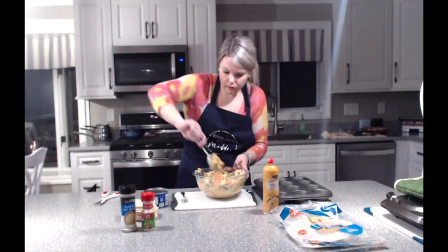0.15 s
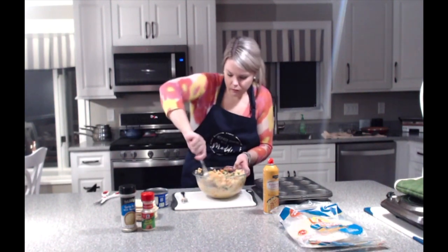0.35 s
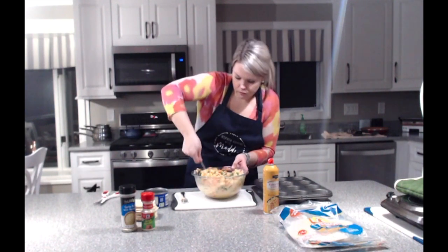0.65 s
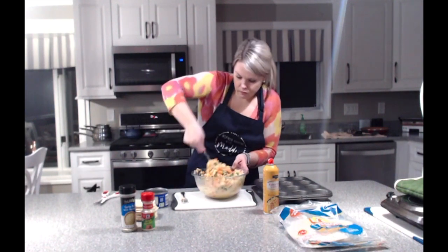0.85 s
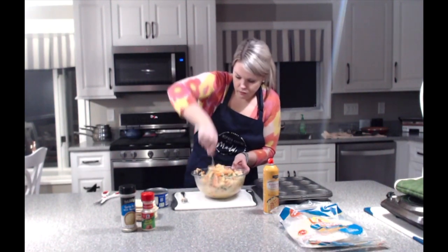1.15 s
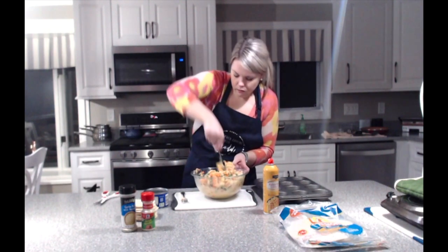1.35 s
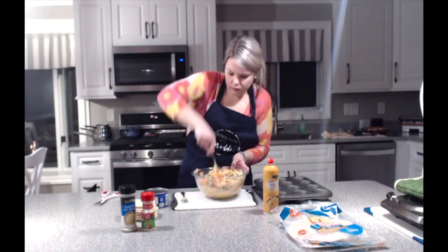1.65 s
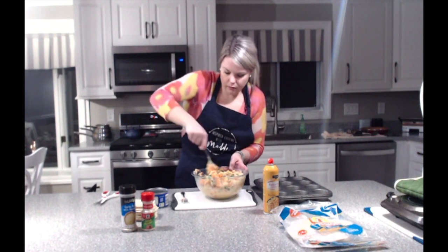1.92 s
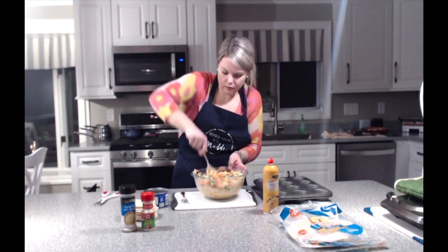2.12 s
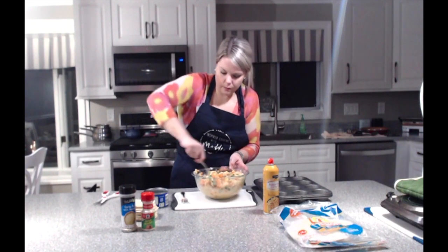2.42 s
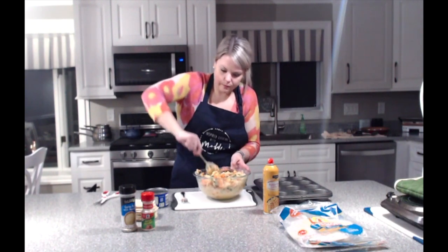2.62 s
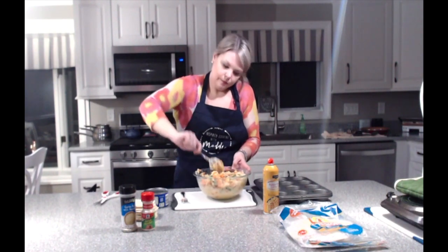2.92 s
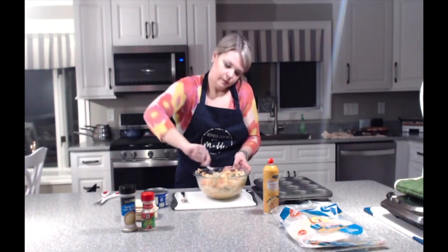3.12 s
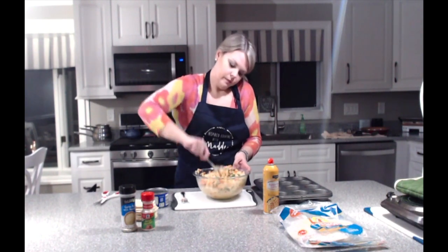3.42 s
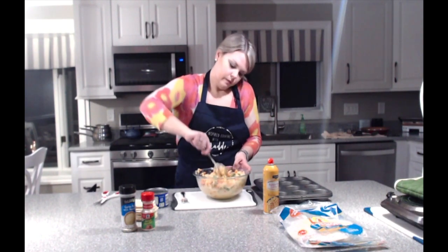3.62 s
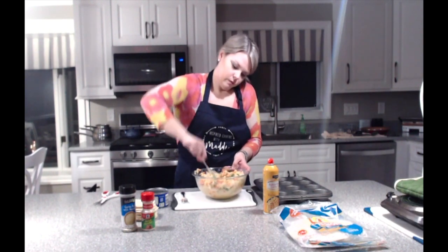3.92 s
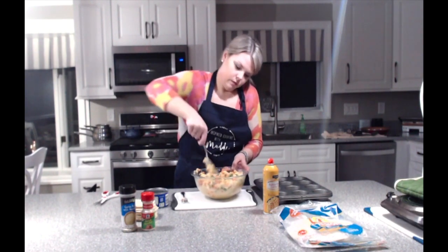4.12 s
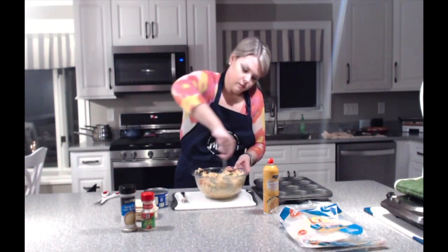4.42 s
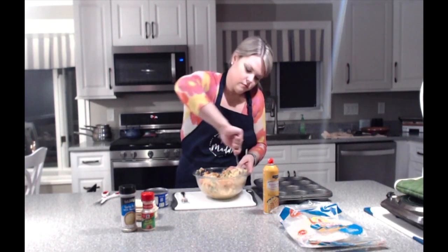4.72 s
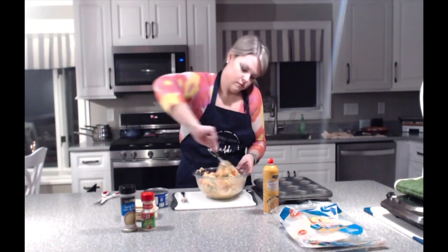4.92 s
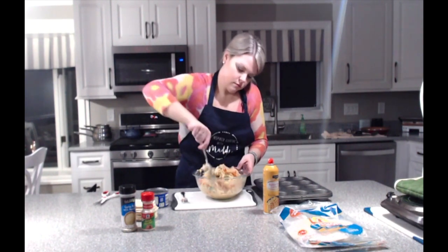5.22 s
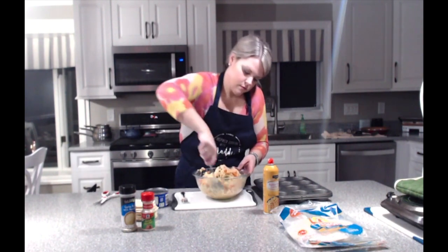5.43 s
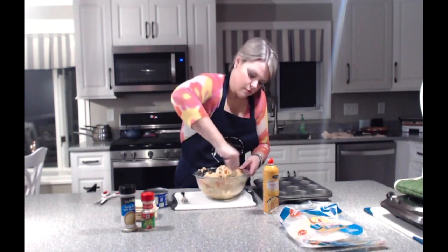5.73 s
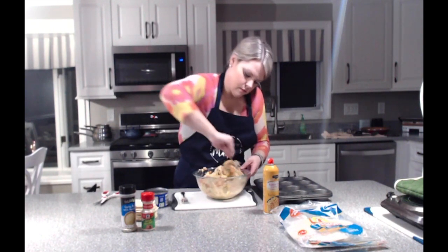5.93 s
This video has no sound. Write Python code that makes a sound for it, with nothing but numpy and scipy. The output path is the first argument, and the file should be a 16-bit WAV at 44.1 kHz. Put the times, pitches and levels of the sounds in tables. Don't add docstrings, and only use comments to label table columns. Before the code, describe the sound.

Wet stirring in a hard-walled kitchen, with muffled taps, one very loud sharp glass clink midway, and steady appliance hum and hiss.

```python
import sys
import numpy as np
from scipy import signal
from scipy.fft import rfft, irfft, next_fast_len
from scipy.io import wavfile
from scipy.ndimage import uniform_filter1d

SR = 44100
rng = np.random.default_rng(int(sys.argv[2]) if len(sys.argv) > 2 else 0)


def field_ratio(decibels):
    return 10 ** (np.asarray(decibels, dtype=float) / 20)


def store_wav(level_fs):
    pcm = np.round(np.clip(np.atleast_2d(level_fs), -1, 1) * 32767)
    wavfile.write(sys.argv[1], SR, pcm.T.astype(np.int16))


N = 267246

# pitch_hz, level_db (per Hz)
HUM_AND_HISS = [(15, -58.5), (30, -26), (53, -7.5), (92, -6), (205, -4), (234, -10), (260, -4.5), (364, -3),
                (394, -6.5), (628, -19), (859, -14), (1340, -20.5), (3780, -28.5), (12500, -38.5),
                (16200, -74.5), (22000, -120)]
AIR_DB, AIR_TOP_HZ = -46.5, 12500
# pitch_hz, width_hz, lift_db
ROOM_MODES = [(67, 3.3, 6), (159.4, 21, 6.5), (209.2, 7.4, 11), (265.7, 11, 6), (336, 39, -2),
              (431.7, 6.7, 11), (487, 14.6, 9), (863, 29, 4)]
# delay_s, level_db
WALL_ECHOES = [(.0058, -8), (.0095, -14), (0.0143, -13), (0.0178, -14), (.0215, -14), (.030, -18),
               (.043, -17)]
# pitch_hz, t60_s (time to fall 60 dB)
KITCHEN_DECAY = [(300, .2), (700, 0.24), (1400, 0.27), (2600, .3), (5000, 0.23), (7500, 0.23), (9000, 0.19),
                 (16000, 0.13)]

# start_s, length_s, slop_db, crackle_over_slop_db
STROKES = [(0.197, .3, -48, -6), (0.498, 0.22, -50.5, -9), (0.76, 0.12, -61, -6), (1.03, 0.16, -52.5, -4.5),
           (1.346, 0.16, -51.5, -5.5), (1.67, 0.17, -51, -8.5), (1.964, 0.1, -47.5, -6.5),
           (2.274, 0.23, -51.5, -6.5), (3.058, 0.21, -48, -4), (3.412, 0.14, -51.5, -6.5),
           (3.62, .18, -65, 0), (3.887, 0.04, -46.5, -13), (4.183, 0.26, -48, -5.5),
           (4.617, 0.22, -60.5, -1.5), (4.874, .17, -49.5, -5.5), (5.27, 0.068, -51.5, -10),
           (5.48, 0.26, -51, -7.5), (5.817, .12, -73.5, 10)]
BITE_S, SETTLE_S = 0.014, 0.05
# crackle_db, slop_db
SLUMP_DB = (-61, -59)
# pitch_hz, level_db (per Hz)
SLOP_TONE = [(500, -49.5), (800, 6.5), (1200, 6.5), (1900, 3.5), (2700, -2.5), (4000, -39.5), (13000, -98)]
# pitch_hz, level_db (per Hz)
CRACKLE_TONE = [(2000, -44), (3000, -5), (5000, -1.5), (8000, -8.5), (11000, -16.5), (13100, -22),
                (13450, -80.5)]
# start_s, peak_db, pitch_hz
SNAPS = [(0.6729, -47, 9810), (0.7894, -51, 9100), (1.1694, -51, 9990), (1.2694, -61, 7900),
         (1.3369, -51, 9570), (1.4671, -49, 8460), (1.5794, -55, 10500), (1.6694, -56, 7830),
         (1.8394, -53, 8040), (2.1294, -63, 8100), (3.5523, -49, 10400), (3.6, -51, 8740),
         (3.7294, -59, 7550), (4.4478, -50, 7800), (5.4869, -49.5, 10100), (5.5827, -55, 7910),
         (5.6776, -49, 8240), (5.8222, -46, 9900)]
SNAP_T60_S = 0.008

# start_s, peak_db, pitch_hz, t60_s
TICKS = [(2.2923, -45, 4200, 0.012), (2.3296, -51, 4070, 0.014), (2.3456, -38, 4150, 0.0044),
         (3.0678, -41, 3200, 0.0098), (3.0991, -39, 6140, 0.013), (3.472, -44, 4160, 0.0067),
         (3.5208, -42.5, 4700, 0.014), (3.8831, -41.5, 3680, 0.012), (4.784, -44, 5540, 0.011),
         (4.9647, -44, 5960, 0.008), (5.2672, -43, 4350, 0.011), (5.4782, -40, 4240, 0.0088),
         (5.8083, -45.5, 5000, 0.014)]
# start_s, peak_db, pitch_hz, t60_s
SPOON_RINGS = [(1.963, -40, 15300, .03), (1.97, -40, 14600, 0.036), (1.963, -42.5, 10850, 0.016),
               (1.964, -40, 6400, 0.018), (1.9627, -26.5, 3630, 0.0051), (1.963, -33.5, 4260, 0.011),
               (3.144, -38, 11700, 0.035), (3.148, -46, 10400, 0.03), (3.15, -62, 15300, .02),
               (4.186, -45, 10800, 0.02), (4.257, -44, 10200, .015)]
# start_s, peak_db, pitch_hz, t60_s
KNOCKS = [(0.616, -35, 1250, 0.021), (0.63, -39.5, 2610, .04), (1.068, -42, 973, 0.076),
          (1.073, -17, 1275, 0.011), (1.367, -35, 976, 0.026), (1.38, -32, 1410, 0.051),
          (1.457, -39, 1830, 0.022), (1.699, -37, 1830, 0.022), (1.762, -44, 1570, 0.03),
          (1.969, -39, 1000, 0.031), (2.335, -32, 2195, 0.034), (2.36, -30.5, 2028, 0.045),
          (3.155, -21.5, 1363, 0.038), (3.17, -18, 1317, 0.03), (3.198, -33, 1358, 0.058),
          (3.507, -39.5, 1060, 0.036), (3.734, -39, 1890, 0.02), (3.887, -31, 1710, 0.026),
          (4.891, -49, 1010, 0.015), (5.045, -34, 1100, 0.016), (5.243, -27.5, 1225, 0.031),
          (5.39, -32.5, 1226, 0.027), (5.488, -38, 1920, 0.022), (5.638, -38, 950, 0.034)]
# start_s, peak_db, pitch_hz, t60_s
BOARD_BUMPS = [
    (0.2415, -17, 713, 0.05),
    (0.245, -11.5, 539, 0.027),
    (2.622, -4.5, 912, 0.011),
    (2.623, -20, 542, 0.037),
    (4.27, -40.5, 626, 0.098),
]
# start_s, peak_db, pitch_hz, t60_s
GRAZES = [(5.283, -35.5, 1600, 0.1), (2.2655, -21.5, 1410, 0.028), (2.305, -29, 1353, 0.071),
          (2.6005, -26, 1410, 0.027), (2.6075, -23, 1410, 0.065), (2.608, -31.5, 3975, 0.045),
          (4.198, -14, 2620, 0.11), (4.217, -26, 2530, 0.036), (4.2375, -23, 2560, 0.037),
          (4.2545, -19, 4050, 0.062), (4.256, -17.5, 2640, 0.027), (4.257, -39, 7340, 0.024),
          (4.257, -17, 1310, 0.016), (4.263, -21.5, 1460, 0.025), (4.271, -14, 1484, 0.035),
          (4.269, -21.5, 2150, 0.046), (4.273, -23, 2490, 0.03), (4.286, -25, 2670, 0.023),
          (4.287, -27, 1360, 0.02)]

# start_s, level_db, contact_s, room_db, linger (factor on the #
CLINKS = [
    (0.2408, -8.5, 0.0015, -3, .9),
    (2.6217, -2.5, 0.00051, -1.5, 1.25),
    (4.1845, -21, 0.0017, -4, .8),
]
# pitch_hz, t60_s, low_wall_db, lip_db, handle_side_db
BOWL_MODES = [(1147, 0.071, -9, -18, -40), (1410, 0.058, -7.5, -11, -12.5), (2000, 0.066, -13.5, -12, -41),
              (2224, 0.021, 2, 3.5, -33), (2497, 0.021, 12.5, -10.5, -20), (2618, 0.03, 0, 3, 5),
              (2783, 0.01, 6, 8, -6), (2974, 0.028, -2, -8.5, -27), (4037, 0.029, 0.5, 2.5, 8.5),
              (4237, 0.014, 7.5, 7, -1), (4800, 0.012, 0.5, 0.5, -34), (5640, 0.03, -15, 2, -16.5),
              (6250, 0.016, -6.5, -22.5, -40), (6720, 0.017, 0.5, -1, -25), (7240, 0.029, -15, -1, -9),
              (7340, 0.015, 6.5, 0, 6.5), (8550, 0.02, -8.5, -17.5, -20), (9650, 0.034, -17, -8.5, -24),
              (10150, 0.028, -17, -9, -34), (12000, 0.012, -35, -16.5, -22.5),
              (14000, 0.03, -55, -21.5, -44), (15300, 0.037, -39, -30, -60)]
# start_s, level_db, lowest_hz, brightness_db (per octave)
EDGE_CRACKS = [
    (0.24, -25, 5700, -28),
    (2.622, -5.5, 1011, 2),
]

# start_s, peak_db, width_s
THUMP = (2.623, -26, 0.0008)
TOP_HZ = 15800


def unit(x):
    return x / np.sqrt(np.mean(x ** 2) + 1e-20)


def along(points, hz):
    f, v = np.transpose(points)
    return np.interp(np.log(hz + 1), np.log(f + 1), v)


def coloured(x, gain_db):
    m = next_fast_len(len(x) + 8192)
    gain = field_ratio(gain_db(np.fft.rfftfreq(m, 1 / SR)))
    return irfft(rfft(x, m) * gain, m)[:len(x)]


def patchy(x, depth_db):
    z = signal.stft(x, nperseg=512)[2]
    field = uniform_filter1d(rng.standard_normal(z.shape), size=9, axis=0)
    field = uniform_filter1d(field, size=8, axis=1)
    return signal.istft(z * field_ratio(depth_db * unit(field)), nperseg=512)[1][:N]


def ring(hz, t60, t, attack):
    return np.sin(2 * np.pi * hz * t) * field_ratio(-60 * t / t60) * (1 - np.exp(-(t / attack) ** 2))


def add(track, s, sound):
    part = track[round(s * SR):][:len(sound)]
    part += sound[:len(part)]


def room_air():
    def tone(hz):
        lift = sum(db / (1 + ((hz - centre) / width * 2) ** 2) for centre, width, db in ROOM_MODES)
        edge = -60 * np.clip((hz - AIR_TOP_HZ) / 400, 0, 1)
        return along(HUM_AND_HISS, hz) + lift + edge

    return field_ratio(AIR_DB) * unit(coloured(rng.standard_normal(N), tone))


def kitchen(blow, wet_db, linger=0.79):
    hz, t, z = signal.stft(rng.standard_normal(SR // 2), SR, nperseg=256)
    age = t / (linger * along(KITCHEN_DECAY, hz)[:, None])
    tail = signal.istft(z * field_ratio(-60 * age ** 1.7), SR, nperseg=256)[1][:SR // 2]
    tail = tail * (1 - np.exp(-np.arange(len(tail)) / SR / 0.0031))
    answer = field_ratio(wet_db) * tail / np.linalg.norm(tail)
    answer[0] = 1
    for delay, db in WALL_ECHOES:
        answer[round(delay * SR)] += field_ratio(db)
    return signal.fftconvolve(blow, answer)


def strokes():
    s, length, slop_db, crackle_db = np.transpose(STROKES)[:, :, None]
    age = np.arange(0, N, 64) / SR - s
    bite = np.minimum(age, 0) / BITE_S
    settle = np.maximum(age - length, 0) / SETTLE_S
    shape = np.exp(bite - settle)
    strengths = []
    for rest, db in zip(SLUMP_DB, (slop_db + crackle_db, slop_db)):
        power = field_ratio(2 * rest) + (shape ** 2 * field_ratio(2 * db)).sum(0)
        strengths.append(np.sqrt(np.repeat(power, 64)[:N]))
    return strengths


def stirring():
    out = np.zeros(N)
    for strength, tone, pops_per_s in zip(strokes(), (CRACKLE_TONE, SLOP_TONE), (1200, 600)):
        draw = rng.random((2, N))
        size = field_ratio(-2.5 * np.log(draw[1] + 1e-3))
        pops = (draw[0] < pops_per_s / SR) * size * rng.choice([-1, 1], N)
        wet = coloured(kitchen(pops, wet_db=2.0)[:N], lambda hz: along(tone, hz))
        out += strength * field_ratio(-2.5) * unit(patchy(wet, depth_db=1.5))
    return out


def taps(table, spread, lift_db, wet_db, count=3):
    track, t = np.zeros(N), np.arange(SR // 10) / SR
    for s, db, hz, t60 in table:
        places = np.linspace(-1, 1, count) + rng.uniform(-0.74, 1, count) / count
        attack = 0.0003 + 1.8 / hz
        blow = sum(field_ratio(-7 * p ** 2) * ring(hz * (1 + spread * p), t60, t, attack) for p in places)
        blow = blow / np.max(np.abs(blow))
        add(track, s, kitchen(field_ratio(db + lift_db) * blow, wet_db))
    return track


def edge_cracks():
    track, t = np.zeros(N), np.arange(SR // 6) / SR
    for s, db, low_hz, slope in EDGE_CRACKS:
        def tone(hz):
            return slope * np.log2(np.maximum(hz / low_hz, 1)) - 40 * (hz < low_hz)

        burst = coloured(rng.standard_normal(len(t)) * field_ratio(-60 * t / 0.012), tone)
        add(track, s, kitchen(field_ratio(db) * burst, wet_db=5.0, linger=1.3))
    return track


def clinks():
    track, t = np.zeros(N), np.arange(SR // 6) / SR
    for spot, (s, db, contact, wet_db, linger) in enumerate(CLINKS):
        blow = sum(field_ratio(levels[spot]) * ring(hz, t60, t, contact) for hz, t60, *levels in BOWL_MODES)
        add(track, s, kitchen(field_ratio(db) * blow, wet_db, linger))
    return track


def scene():
    snaps = [(*snap, SNAP_T60_S) for snap in SNAPS]
    bright = taps(snaps, spread=0.14, lift_db=0.0, wet_db=-8, count=5)
    bright += taps(TICKS, spread=0.077, lift_db=-2.0, wet_db=0.0)
    bright += taps(SPOON_RINGS, spread=0.025, lift_db=2.5, wet_db=-22.0)
    dull = taps(KNOCKS, spread=0.2065, lift_db=-1.0, wet_db=-6.5, count=7)
    dull += taps(BOARD_BUMPS, spread=0.19, lift_db=-2.5, wet_db=-9.5, count=5)
    glass = taps(GRAZES, spread=0.027, lift_db=-3.5, wet_db=-8.5)
    glass += edge_cracks() + clinks()
    return (room_air() + stirring() + bright + dull + glass)[None]


def top_cut(x):
    return signal.sosfilt(signal.butter(12, 21850, fs=SR, output="sos"), x)


def record(dry):
    t = np.arange(N) / SR
    overload = np.maximum(np.abs(dry[0]) - 1, 0)
    recent = t[:SR // 2]
    response = np.exp(-recent / 0.07) * (1 - np.exp(-recent / 0.003))
    memory = signal.fftconvolve(overload, response)[:N]
    ducked = dry[0] * field_ratio(-8 * np.tanh(memory / 9))
    s, db, width = THUMP
    thump = field_ratio(db) * np.exp(-((t - s) / width) ** 2)
    clipped = np.clip(ducked + thump, -0.99, 0.99)
    mix = coloured(clipped, lambda hz: -45 * np.clip((hz - TOP_HZ) / 300, 0, 1))[None]
    return top_cut(mix)


dry = scene()
out = record(dry)
store_wav(out)
```